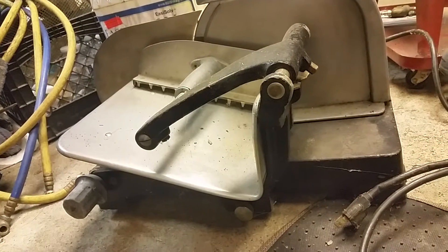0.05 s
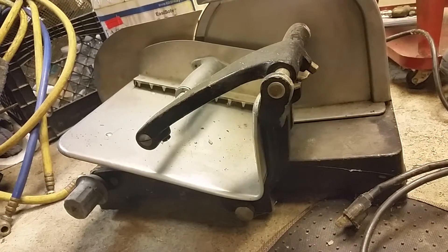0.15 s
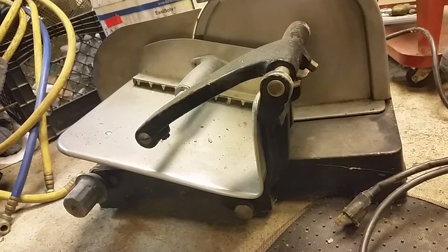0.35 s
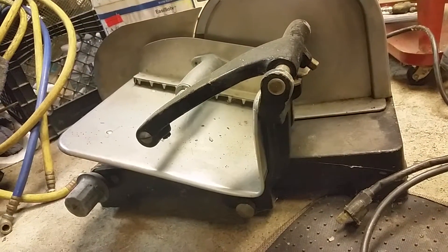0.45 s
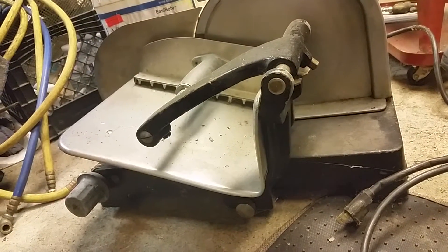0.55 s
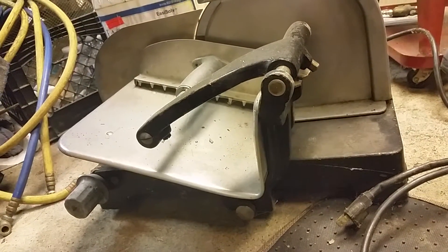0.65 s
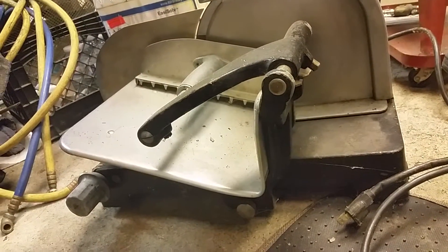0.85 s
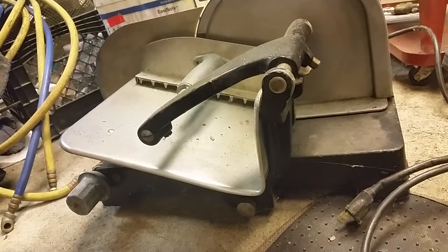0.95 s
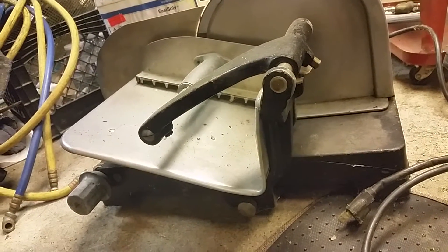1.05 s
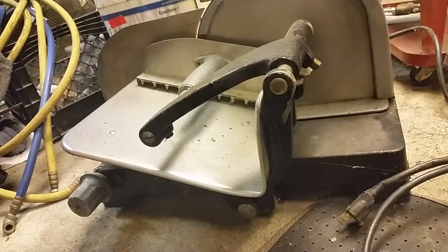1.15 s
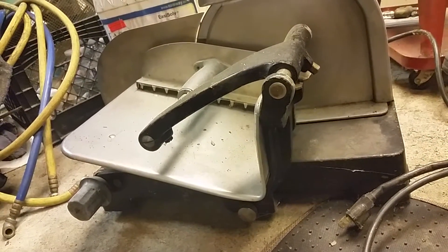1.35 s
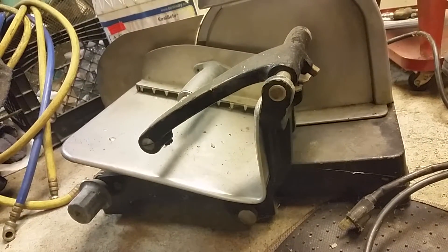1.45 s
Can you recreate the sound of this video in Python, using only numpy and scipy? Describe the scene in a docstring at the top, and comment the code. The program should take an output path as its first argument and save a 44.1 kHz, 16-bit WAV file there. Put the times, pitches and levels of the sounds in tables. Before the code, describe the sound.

One strong, dull thump of fingers on a hand-held microphone, close on the right, followed by softer bumps, a short scuff and a light fading rustle. Behind it, a quiet workshop with a steady low motor hum and rumble.

```python
"""Fingers bump a hand-held camera: one strong dull thump by the right microphone, then softer ones.
Each is a smooth push on the case with a touch of skin noise. A short scuff with a faint tick
trails off as a light rustle, and the grip creaks once. Behind it lies a quiet workshop:
a motor humming on mains power, a low room rumble and the hiss of the microphones."""
import sys
import numpy as np
from scipy import signal
from scipy.fft import rfft, irfft
from scipy.io import wavfile

SR = 44100
rng = np.random.default_rng(int(sys.argv[2]) if len(sys.argv) > 2 else 0)


def generate_wav(sig):
    """Save sig (samples, or channels by samples) to the path in sys.argv[1] as 16-bit PCM at SR."""
    pcm = np.round(np.clip(np.atleast_2d(sig).T, -1, 1) * 32767).astype(np.int16)
    wavfile.write(sys.argv[1], SR, pcm)


N = 66150
TIME, FREQS = np.arange(N) / SR, np.fft.rfftfreq(N, 1 / SR)


def gain_of(db):
    """Decibels to gain."""
    return 10 ** (np.asarray(db) / 20)


def unit_rms(x):
    """Scales each channel to rms 1."""
    return x / np.sqrt(np.mean(abs(x) ** 2, axis=-1, keepdims=True) + 1e-30)


def curve(points):
    """Joins breakpoints over log frequency, one value per bin."""
    hz, value = np.transpose(points)
    return np.interp(np.log(FREQS + 1), np.log(hz + 1), value)


def pan(pan_db):
    """Stereo gains for a left-minus-right balance; the nearer side keeps its level."""
    balance = np.atleast_1d(pan_db)
    return gain_of(np.minimum([balance, -balance], 0))


def noise(spectrum, pan_db=0, likeness=0):
    """Stereo noise with the given spectral density; likeness 0 is wide, 1 is mono."""
    left, other = rfft(rng.standard_normal((2, N)))
    right = likeness * left + np.sqrt(1 - likeness ** 2) * other
    shaped = np.array([left, right]) * gain_of(curve(spectrum)) * pan(pan_db)
    return irfft(shaped, N) * np.sqrt(SR / 2)


def resonance(hz, width_hz):
    """Two channels of noise held in one resonance, rms 1."""
    detune = (FREQS - hz) / width_hz
    white = rfft(rng.standard_normal((2, N)))
    return unit_rms(irfft(white / (1 + 2 * detune ** 2), N))


def envelope(start_s, rise_s, hold_s, fall_db_per_s):
    """Linear attack, hold, then a steady fall in decibels."""
    t = TIME - start_s
    return np.clip(t / rise_s, 0, 1) * gain_of(-fall_db_per_s * np.maximum(t - rise_s - hold_s, 0))


# Tone of the hiss: (frequency [Hz], density [dB/Hz])
HISS_SPECTRUM = [(500, -127), (2500, -124.5), (3900, -124.5), (4350, -116), (4750, -125), (5400, -132),
                 (6500, -135.5), (9500, -133), (11000, -125.5), (12400, -122.5), (13200, -124),
                 (14400, -118)]
# Where the hiss leans: (frequency [Hz], left minus right [dB])
HISS_BALANCE = [(2000, -2.5), (3500, 1), (4200, 5), (5000, 0.5), (8000, -0.5), (11000, 3), (14000, 1.5)]


def microphone_hiss():
    """A thin, steady noise floor, each microphone making its own."""
    return noise(HISS_SPECTRUM, curve(HISS_BALANCE))


# Bass-heavy room tone: (frequency [Hz], density [dB/Hz])
RUMBLE_SPECTRUM = [(15, -97), (30, -86), (50, -88), (100, -85.5), (170, -84), (250, -89.5), (400, -97.5),
                   (580, -101), (800, -113), (1100, -118), (1850, -120), (2300, -129), (6000, -145)]
# How alike the rumble is at the two microphones: (frequency [Hz], likeness [0-1])
RUMBLE_IMAGE = [(40, 0.62), (100, 0.44), (200, 0.17), (400, 0.21), (700, 0.31), (1500, 0.075)]


def room_rumble():
    """A low bed of noise with one booming room resonance near the centre of the image."""
    mid, side = gain_of(-62) * resonance(hz=70.66, width_hz=5)
    boom = mid + 0.26 * np.array([side, -side])
    return boom + noise(RUMBLE_SPECTRUM, pan_db=-2.0, likeness=curve(RUMBLE_IMAGE))


# Harmonics of the hum: (multiple of the magnetic pull [x], level [dB],
# left minus right [dB], right channel lag [rad], waver depth [0-1])
HUM_HARMONICS = [(1, -61.5, -2, 0.15, 0.2), (2, -73.5, 0, .5, 0.9), (3, -62.5, -1.5, 0.36, .04),
                 (4, -68, 1, 0.27, .04), (6, -90, -8.5, 1.1, 0), (10, -101, -6, .8, 0.2),
                 (13, -101, -3, 0.92, 0.2)]


def motor_hum(pull_hz=120, waver_hz=11):
    """Multiples of the magnetic pull, most of them wavering, reach the two microphones out of step."""
    hum = np.zeros((2, N))
    for multiple, db, pan_db, lag, depth in HUM_HARMONICS:
        phase = 2 * np.pi * (multiple * pull_hz * TIME + rng.random()) - np.array([[0], [lag]])
        waver = 1 + depth * (resonance(0, waver_hz) + 1j * resonance(0, waver_hz))
        harmonic = (waver * np.exp(1j * phase)).real
        hum += gain_of(db) * pan(pan_db) * unit_rms(harmonic)
    return hum


def grip_creak():
    """One tiny creak of the grip: a blip of narrow, pitched noise."""
    tone = gain_of(-83) * resonance(hz=1910, width_hz=100)
    return tone * envelope(start_s=0.688, rise_s=0.007, hold_s=0.005, fall_db_per_s=800)


# Soft rubbing with a little air on top: (frequency [Hz], density [dB/Hz])
RUSTLE_SPECTRUM = [(60, -81.5), (220, -91), (400, -95.5), (700, -107), (1000, -112), (1850, -115),
                   (2300, -125), (3500, -126), (6500, -140), (9000, -133), (12000, -125), (14400, -123)]


def grip_rustle():
    """Light rubbing that dies away as the grip settles."""
    rub = noise(RUSTLE_SPECTRUM, pan_db=-1.0, likeness=0.14)
    return rub * envelope(start_s=0.47, rise_s=0.072, hold_s=0.17, fall_db_per_s=32.5)


# Low body of the scuff: (frequency [Hz], density [dB/Hz])
SCUFF_BODY = [(40, -89), (120, -74), (190, -68), (340, -70.5), (480, -75.5), (620, -94.5), (800, -100),
              (1200, -116), (3000, -145)]
# Its midrange grit: (frequency [Hz], density [dB/Hz])
SCUFF_GRIT = [(300, -86), (600, -84.5), (850, -96), (1200, -98.5), (1850, -103), (2200, -113), (3300, -116),
              (5000, -130), (9000, -135)]
# Resonances the scuff rings: (frequency [Hz], width [Hz], rms level [dB])
SCUFF_MODES = [(905, 44, -71.5), (1524, 37, -78), (1966, 24, -89.5)]
# Its bright tick: (frequency [Hz], density [dB/Hz])
SCUFF_TICK = [(3000, -125), (6000, -124), (7500, -117), (11000, -111), (14000, -116)]


def scuff():
    """A dull scrape: low body, a gritty peak that rings faintly, and one small tick."""
    body = noise(SCUFF_BODY, pan_db=-2.5, likeness=0.73)
    body *= envelope(start_s=0.469, rise_s=0.01, hold_s=0.02, fall_db_per_s=153)
    ring = sum(gain_of(db) * resonance(hz, width_hz) for hz, width_hz, db in SCUFF_MODES)
    grit = noise(SCUFF_GRIT, pan_db=-0.5, likeness=0.41) + ring
    grit *= envelope(start_s=0.471, rise_s=0.022, hold_s=0.0047, fall_db_per_s=325)
    tick = noise(SCUFF_TICK, pan_db=7.5)
    tick *= envelope(start_s=0.4865, rise_s=0.00079, hold_s=0.0026, fall_db_per_s=602)
    return body + grit + tick


# Finger hits: (time [s], half-length [s], level before the bass cut [dB], left minus right [dB])
FINGER_HITS = [(0.0556, 0.0019, -36, -8), (.2299, 0.0006, -3, -35), (0.3599, 0.00078, -27, 5),
               (0.3622, 0.00127, -23, -35), (0.4416, 0.001, -43, 3), (0.6502, 0.00094, -35.5, -9),
               (0.6589, 0.001, -36, 7.5), (0.694, 0.0027, -39.5, 19), (0.711, 0.0016, -38, 7),
               (0.726, 0.0025, -39.5, 5), (0.8259, 0.0012, -36, -14), (0.8338, 0.0011, -34, -16),
               (0.868, 0.0022, -40, 0)]
# Skin noise for a hit of 0 dB: (frequency [Hz], density [dB/Hz])
SKIN_SPECTRUM = [(200, -80.5), (800, -80), (1400, -84), (2200, -104), (3200, -108), (5000, -115),
                 (14000, -119)]


def finger_bumps(case_hz=71, leak_hz=47.7, skin_fall_s=0.00351, skin_db_per_db=1.6):
    """Each bump is one smooth push on the case, with skin noise that comes out in the hard ones."""
    push, skin_level = np.zeros((2, N)), np.zeros(N)
    for peak_s, half_length_s, db, pan_db in FINGER_HITS:
        t = TIME - peak_s
        push -= gain_of(db) * pan(pan_db) * np.exp(-0.5 * (t / half_length_s) ** 2)
        attack = np.clip(t / half_length_s + 2, 0, 1)
        decay = np.exp(-np.maximum(t, 0) / skin_fall_s)
        skin_level += gain_of(skin_db_per_db * db) * attack * decay
    # The microphones lose the deep bass of a push.
    thumps = signal.lfilter(*signal.butter(2, case_hz, "high", fs=SR), push)
    thumps = signal.lfilter(*signal.butter(1, leak_hz, "high", fs=SR), thumps)
    return thumps + skin_level * noise(SKIN_SPECTRUM, pan_db=-10)


def scene():
    """The steady workshop bed, with the handling sounds on top."""
    bed = microphone_hiss() + room_rumble() + motor_hum()
    return bed + grip_creak() + grip_rustle() + scuff() + finger_bumps()


def record(dry):
    """A steep low-pass takes off the air above 14.6 kHz."""
    low_pass = signal.firwin(511, 14600, window=("kaiser", 9), fs=SR)
    return signal.oaconvolve(dry, low_pass[None], "same")


dry = scene()
out = record(dry)
generate_wav(out)
```